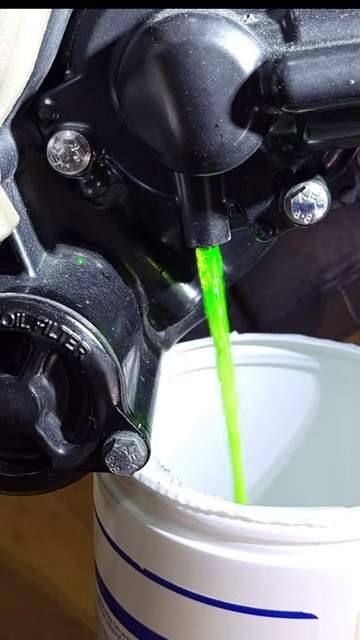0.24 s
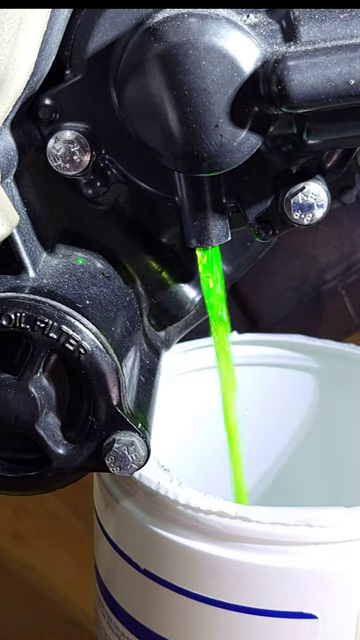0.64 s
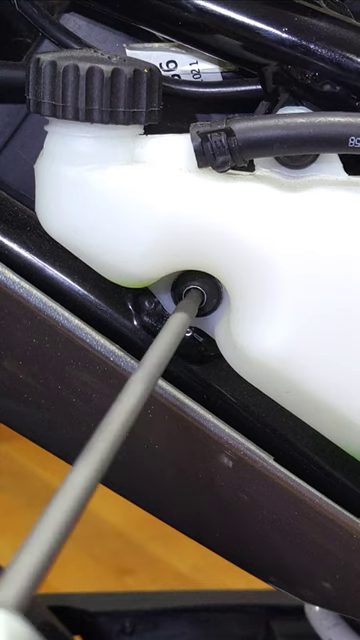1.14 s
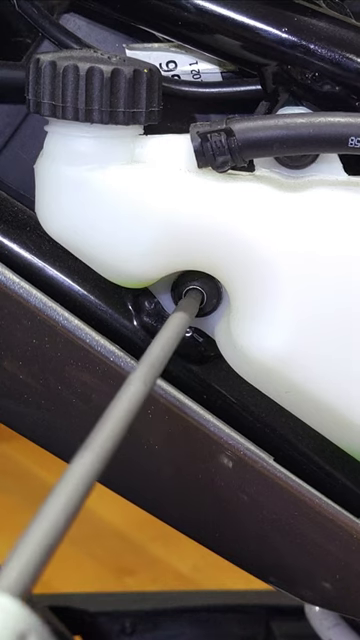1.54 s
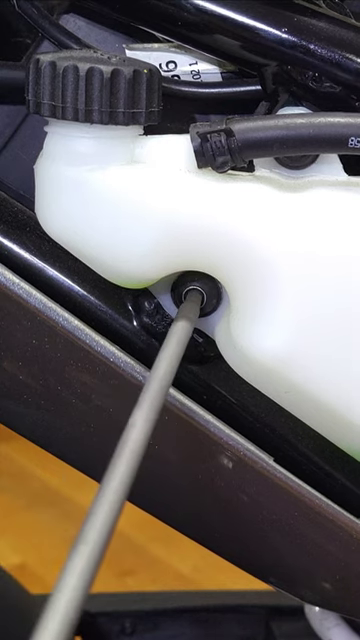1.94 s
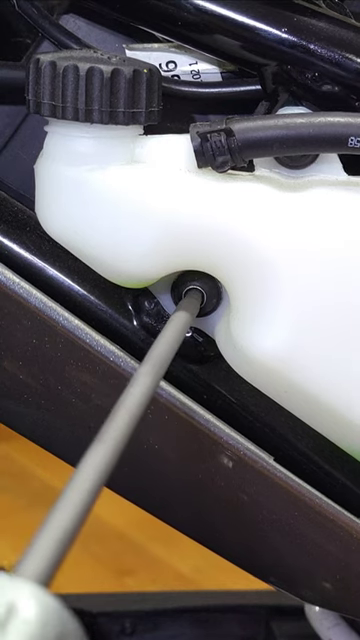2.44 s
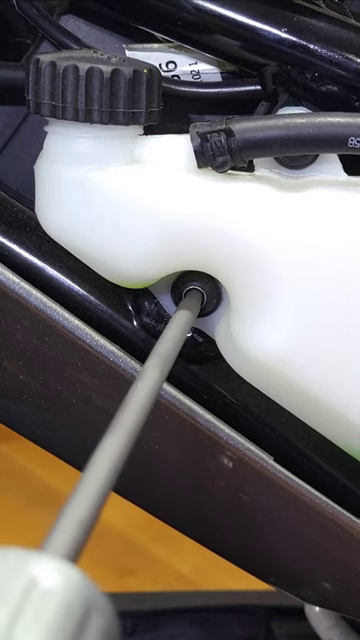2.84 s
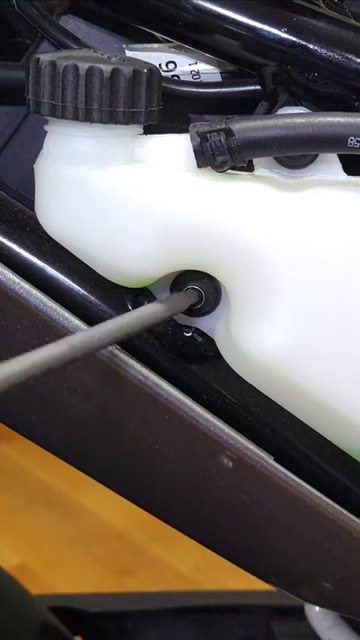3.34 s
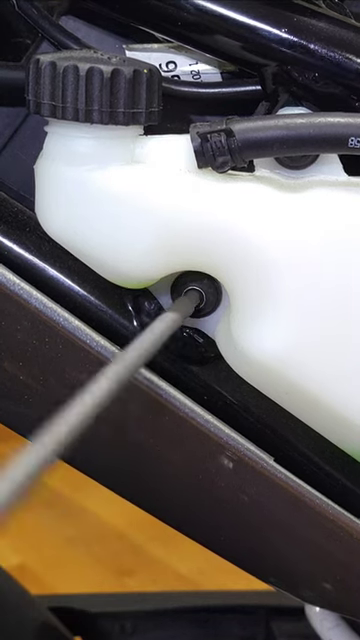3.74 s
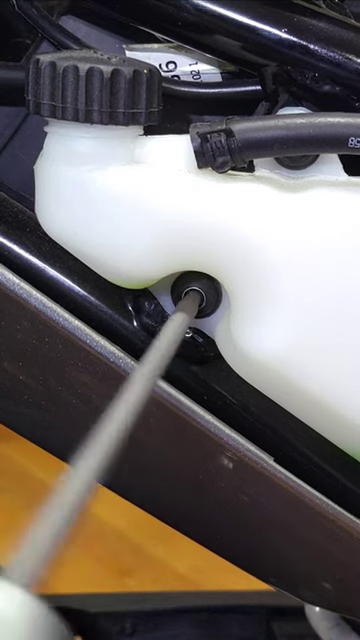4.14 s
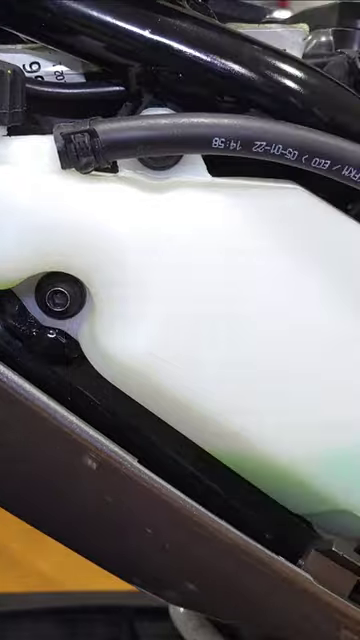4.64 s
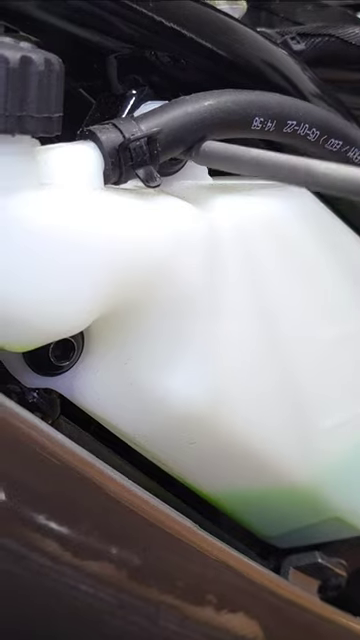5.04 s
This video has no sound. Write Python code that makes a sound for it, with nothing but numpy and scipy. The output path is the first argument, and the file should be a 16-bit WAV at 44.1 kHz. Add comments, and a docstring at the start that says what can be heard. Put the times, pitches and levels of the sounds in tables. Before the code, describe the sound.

First a bright, plopping pour into a hollow plastic container, ending suddenly. Then near silence over ventilation rumble, a dull tool knock, and irregular ratchety creaks from a screw in a plastic tank. Loud double-edged snaps come mid-way and late, ringing briefly in the room. Soft skin rubs and tiny ticks fill the pauses. Close, detailed stereo sound.

```python
"""A stream of coolant splashes and bubbles from an engine into a plastic tub; its sound stops abruptly. Then a
screwdriver works on the screws of a plastic tank: the tight thread creaks in runs of stick-slip clicks and
twice cracks loose, among soft touches of tool and hand. The screw sounds echo in a hard-walled workshop; two
close microphones hear it all over rumble and hum. Contacts are short bursts of shaped noise, bubbles are
gliding decaying sines, and resonances of tub, tank and frame colour them."""
import sys
import numpy as np
from scipy import signal
from scipy.fft import rfft, irfft, next_fast_len
from scipy.io import wavfile
from scipy.ndimage import uniform_filter1d

SR = 44100
rng = np.random.default_rng(int(sys.argv[2]) if len(sys.argv) > 2 else 0)


def digitize_waveform(pressure):
    """Quantize a signal to 16-bit integers and store it at the path in sys.argv[1].

    Rows of a 2-D input are taken as channels; values are limited to [-1, 1].
    """
    field = np.atleast_2d(pressure).T
    bounded = np.clip(field, -1, 1)
    quanta = np.round(bounded * 32767).astype(np.int16)
    wavfile.write(sys.argv[1], SR, quanta)


N = 233639
TIME = np.arange(N) / SR
BLOW = TIME[:4096]  # time axis of one short contact or bubble (s)
POUR_END_S = .677


def undb(db):
    """Decibels to gain."""
    return 10 ** (np.asarray(db) / 20)


def unit(x):
    """Scale to rms 1."""
    return x / np.sqrt(np.mean(x ** 2))


def along(points, hz):
    """Read (freq_hz, value) points on a log-frequency axis."""
    f, value = np.transpose(points)
    return np.interp(np.log(hz + 1), np.log(f), value)


def colour(x, points, peaks=()):
    """Causal minimum-phase filter: a broad spectrum with resonances standing on it."""
    size = 2 * next_fast_len(x.shape[-1])
    hz = np.fft.rfftfreq(size, 1 / SR)
    db = along(points, hz)
    for centre_hz, width_hz, gain_db in peaks:
        db = db + gain_db / (1 + (2 * (hz - centre_hz) / width_hz) ** 2)
    # folding the cepstrum onto positive times makes the response causal
    cepstrum = irfft(np.log(undb(db)))
    cepstrum[1:size // 2] *= 2
    cepstrum[size // 2 + 1:] = 0
    response = np.exp(rfft(cepstrum))
    return irfft(rfft(x, size) * response)[..., :x.shape[-1]]


def fade(t, t60):
    """Exponential decay, 60 dB in t60 seconds."""
    return np.exp(-np.log(1000) * t / t60)


def add(out, s, sound, lag_ms=0, pan_db=0):
    """Mix a sound in at s seconds; the right microphone hears it lag_ms later and pan_db weaker."""
    stereo = np.broadcast_to(sound, (2, sound.shape[-1]))
    for channel, side, lag_s, part in zip(out, (1, -1), (0, lag_ms / 1000), stereo):
        start = max(int((s + lag_s) * SR), 0)
        span = channel[start:start + len(part)]
        span += part[:len(span)] * undb(side * pan_db / 2)


def pair(size, likeness):
    """Noise for two microphones, partly shared: likeness 0 is independent, 1 identical."""
    shared, *own = rng.standard_normal((3, size))
    return np.sqrt(likeness) * shared + np.sqrt(1 - likeness) * np.array(own)


def burst(grain, t60, tick, rise=0.00042):
    """A contact and the dense, short ring of a damped part, built up over rise seconds; even in spectrum."""
    ring = grain * fade(BLOW, t60) * (1 - np.exp(-BLOW / rise))
    ring[:, int(rise * SR)] += tick
    spectrum = rfft(ring)
    power = uniform_filter1d(np.abs(spectrum) ** 2, size=48, axis=-1)
    even = irfft(spectrum * np.sqrt(power.mean() / power))
    return even * fade(BLOW, .25)


def bubble(hz, cycles, rise):
    """A trapped bubble rings down, its pitch gliding up by rise octaves as it nears the surface."""
    life = cycles / hz
    pitch_hz = hz * 2 ** (rise * np.minimum(BLOW / life, 1))
    tone = np.sin(2 * np.pi * np.cumsum(pitch_hz) / SR)
    return tone * fade(BLOW, life) * (1 - np.exp(-BLOW * hz))


# spectrum of the air in the building: freq_hz [Hz], level_db [dB]
AIR_COLOUR = [(12, -41), (20, 0.5), (74, -2), (134, -15), (198, -14), (328, -19), (357, -15.5), (513, -25),
              (590, -24), (873, -33), (1150, -34), (1910, -44.5), (4940, -52.5), (6720, -60.5),
              (16000, -63)]
AIR_DB = -54.5  # rms
# narrow bands of ventilation hum: pitch_hz [Hz], level_db [dB, rms]
HUM_BANDS = [(75, -65.5), (106, -70.5), (199, -69), (241, -71), (297, -71), (360, -69), (724, -82.5)]


def background():
    """Low rumble of the building, alike at both microphones, with a wavering hum of ventilation."""
    rumble = colour(pair(N, 1.0), [(110, -1.5), (220, -5.5), (600, -27.0)])
    diffuse = colour(pair(N, 0.25), [(40, -18.5), (110, -12), (220, -6.5), (600, 3.5)])
    air = undb(AIR_DB) * unit(colour(rumble + diffuse, AIR_COLOUR))
    hum = 0
    for hz, level_db in HUM_BANDS:
        # noise in a narrow band wavers
        band = [(hz * .85, -110), (hz * .98, 0), (hz * 1.02, 0), (hz * 1.15, -110)]
        hum = hum + undb(level_db) * unit(colour(pair(N, .88), band))
    return air + hum


# decay of the workshop by band: freq_hz [Hz], t60_s [s]
ROOM_DECAY = [(150, 0.32), (700, 0.45), (2400, 0.42), (4500, 0.43), (8000, 0.38), (15000, 0.26)]
# spectrum of the workshop's echoes: freq_hz [Hz], level_db [dB]
ECHO_COLOUR = [(150, -2.5), (450, 4), (750, 1.5), (1100, -4.5), (1500, -1), (2400, 1.5), (3300, -5.5),
               (7500, -4.5), (15000, 1.5)]


def workshop(x):
    """Diffuse echoes of the hard walls, each band with its own decay; the highest treble dies first."""
    t = TIME[:SR]
    hz, noise = np.fft.rfftfreq(SR, 1 / SR), rfft(pair(SR, 0.14))
    tail = 0
    for f, t60 in ROOM_DECAY:
        band = along([(other, float(other == f)) for other, _ in ROOM_DECAY], hz)
        tail = tail + irfft(noise * band) * fade(t, t60)
    # the first echoes arrive after 3 ms
    tail = colour(tail * np.clip((t - .003) / 0.0041, 0, 1), ECHO_COLOUR)
    return undb(-39) * signal.fftconvolve(x, tail, axes=-1)[:, :N]


# spectrum of the splashing droplets: freq_hz [Hz], level_db [dB]
SPLASH_COLOUR = [(100, -20), (250, -10), (420, -10), (900, -9), (1300, -7.5), (1560, -20), (2100, -1),
                 (3300, -17.5), (5000, -20.5), (7000, -11.5), (10000, -20.5), (16000, -21)]
# resonances of the tub's air and walls: centre_hz [Hz], width_hz [Hz], gain_db [dB]
TUB_PEAKS = [(402, 160, 12), (619, 59, 9), (1350, 110, 14), (2120, 300, 1), (4184, 110, 13)]
# big drops and the bubbles they trap: start_s [s], pitch_hz [Hz], bubble_db [dB], splash_db [dB]
BIG_DROPS = [(.012, 1930, -26, -30), (.070, 2170, -30, -27), (.131, 754, -27, -43),
             (.178, 1980, -29.5, -52), (.2285, 2040, -30.5, -30.5), (.257, 584, -24, -58),
             (.493, 1770, -31.5, -34.5), (.529, 2010, -29.5, -32), (.617, 1980, -19, -33),
             (.651, 1291, -23, -34.5)]
SPRAY_DB, GURGLE_DB, DRUMMING_DB = -43.5, -44.5, -52  # spread of each layer during the pour
BUBBLE_RING_S, BUBBLE_RISE_OCT = .026, 0.27  # shared by all big bubbles
GURGLE_FALL_DB_PER_S = 7.5  # the gurgle eases as the stream thins


def pour():
    """The steady stream patters on the liquid, traps bubbles and drums on the tub."""
    spray, bubbles, drops = np.zeros((3, 2, N))
    # droplets: many small ones, a few large
    for when, size, side, seat in rng.random((380, 4)):
        size_db = -4.3 * np.log(size + .05)
        droplet = burst(pair(len(BLOW), 0.49), 0.014, 2.5, .0008) * undb(size_db)
        add(spray, when * POUR_END_S, droplet, .3 * (2 * seat - 1), 6 * (side - .5))
    # the smallest bubbles fizz far above the gurgle
    for when, pitch, size, side, rise in rng.random((180, 5)):
        fizz = bubble(3500 * 2 ** (2 * pitch), 50, .15 * rise) * undb(21.8 * size - 8.5)
        add(spray, when * POUR_END_S, fizz, 0.34 * (2 * side - 1), 8 * (side - .5))
    for when, pitch, size, side, rise in rng.random((130, 5)):
        s = when * POUR_END_S
        blip = bubble(400 * 2 ** (2.5 * pitch), 19, .3 * rise)
        blip = blip * undb(17 * size - GURGLE_FALL_DB_PER_S * s)
        add(bubbles, s, blip, 0.4 * (2 * side - 1), 8 * (side - .5))
    for s, hz, bubble_db, splash_db in BIG_DROPS:
        splash = burst(pair(len(BLOW), 0.39), 0.04, 1.5, 0.0006)
        splash = colour(splash, [(200, -3.5), (2200, 7.5), (4500, -4.5), (15000, 0)])
        ringing = bubble(hz, BUBBLE_RING_S * hz, BUBBLE_RISE_OCT)
        add(drops, s, undb(bubble_db) * ringing + undb(splash_db) * splash, .07)
    spray = colour(spray, SPLASH_COLOUR, TUB_PEAKS)
    gurgle = colour(bubbles, [(150, -5.5), (400, -9.5), (1200, 6), (1560, -7.5), (2100, 6)], TUB_PEAKS)
    drumming = colour(pair(N, 1.0), [(40, -9), (90, 5.5), (160, -6.0), (260, -20), (600, -35)])
    layers = [(spray, SPRAY_DB), (gurgle, GURGLE_DB), (drumming, DRUMMING_DB)]
    stream = sum(undb(db) * x / np.std(x[:, TIME < POUR_END_S]) for x, db in layers)
    # the sound of the pour falls silent within 9.3 ms
    return (stream + drops) * np.clip((POUR_END_S + 0.0064 - TIME) / 0.0093, 0, 1)


# the hand slides to a new grip between turns: start_s [s], length_s [s], level_db [dB, before colouring]
GRIP_SLIDES = [(2.15, .22, -59), (2.77, .06, -56), (3.1, .08, -63), (4.0, .22, -59)]
# spectrum of skin on the handle: freq_hz [Hz], level_db [dB]
GRIP_COLOUR = [(300, -14), (1300, 0.5), (2500, -3), (5300, 1), (8000, -7.5), (15000, -19.5)]


def regrips():
    """Skin catches on the handle in a flurry of tiny grains."""
    out = np.zeros((2, N))
    for s, length_s, level_db in GRIP_SLIDES:
        for when, size in rng.random((16, 2)):
            grain = burst(pair(len(BLOW), .4), .03, 1.5)
            add(out, s + when * length_s, undb(level_db - 15 * size) * grain, .2)
    return colour(out, GRIP_COLOUR)


# the tip drops into the screw head and rocks once: start_s [s], level_db [dB, before colouring]
SEATING_KNOCKS = [(1.309, -13.5), (1.335, -24.5)]
# spectrum of the seating tip: freq_hz [Hz], level_db [dB]
SEATING_COLOUR = [(60, -8.5), (190, -0.5), (450, -15.5), (1500, -12.5), (3300, -21), (7000, -41),
                  (16000, -56)]
# resonances of screw and tank under the tip: centre_hz [Hz], width_hz [Hz], gain_db [dB]
SEATING_PEAKS = [(190, 120, 10.5), (1000, 210, 18.5), (2520, 450, 9)]
# light touches of tool and hand: start_s [s], peak_db [dB], pitch_hz [Hz]
LIGHT_TOUCHES = [(2.169, -47, 907), (2.205, -47, 1320), (2.272, -48, 900), (2.778, -44, 5660),
                 (2.965, -45, 2090), (3.466, -37.5, 550), (3.942, -41, 1440), (4.187, -44.5, 1000)]
SEAT_RING_S, TOUCH_RING_S = 0.03, .023
# fainter touches that fall anywhere after the pour
FAINT_DB, FAINT_SPREAD_DB, FAINT_LOW_HZ, FAINT_HIGH_HZ = -64.5, 8.5, 1100, 5500


def after_pour(when):
    """Map 0..1 to a moment (s) between the end of the pour and the end of the scene."""
    return POUR_END_S + when * (N / SR - POUR_END_S)


def touches():
    """The tip finds the screw; soft contacts each ring one resonance, among tiny ticks strewn at random."""
    out, ticks = np.zeros((2, 2, N))
    for s, level_db in SEATING_KNOCKS:
        knock = burst(pair(len(BLOW), .4), SEAT_RING_S, .8, 0.0013)
        add(out, s, undb(level_db) * colour(knock, SEATING_COLOUR, SEATING_PEAKS), .2)
    contacts = list(LIGHT_TOUCHES)
    for when, size, pitch in rng.random((22, 3)):
        pitch_hz = FAINT_LOW_HZ * (FAINT_HIGH_HZ / FAINT_LOW_HZ) ** pitch
        contacts.append((after_pour(when), FAINT_DB + FAINT_SPREAD_DB * size, pitch_hz))
    for s, peak_db, hz in contacts:
        contact = burst(pair(len(BLOW), 0.15), TOUCH_RING_S, 0.82, 0.0025)
        spectrum = [(hz / 4, -20), (hz, 0), (hz * 2, -14), (hz * 10, -60)]
        knock = colour(contact, spectrum, [(hz, .25 * hz, 7)])
        add(out, s, undb(peak_db) * knock / np.abs(knock).max(), .2)
    for when, size, side in rng.random((80, 3)):
        tick = undb(-79 + 13 * size) * burst(pair(len(BLOW), .5), .012, 3)
        add(ticks, after_pour(when), tick, .2, 8 * (side - .5))
    return out + colour(ticks, [(800, -11.0), (5000, -3.5), (15000, -4)])


# the screw cracks loose: start_s [s], level_db [dB, before colouring], thump_db [dB], treble_db [dB],
# ring_s [s], right microphone's lag_ms [ms], left minus right pan_db [dB]
CRACK_BLOWS = [(3.2464, -10.5, 10.5, 0.5, 0.02, 0.17, 4), (3.2492, -3, -3, 2.5, 0.012, 0.18, -1),
               (3.2533, -24.5, 2, -8.5, 0.067, .2, 1), (3.267, -24, -9, -3.5, 0.016, 0.31, 0),
               (4.8790, -10, 11.5, -3, 0.011, -0.019, -2), (4.8820, -16, 3.5, -12, 0.025, -0.17, 1)]
# spectrum of a crack: freq_hz [Hz], level_db [dB]
CRACK_SPECTRUM = [(59, -43), (100, -19.5), (328, -17), (513, -20.5), (784, -1.5), (1150, -12.5),
                  (1450, -11), (1830, -7), (2580, -4), (5300, -8), (5900, -11), (7770, -9), (9820, -17),
                  (15000, -19), (16000, -30.5)]
# resonances of screwdriver and frame under a crack: centre_hz [Hz], width_hz [Hz], gain_db [dB]
FRAME_PEAKS = [(111, 250, 5.5), (332.6, 330, 5), (720, 120, 2.5), (1000, 120, 7.5), (1433, 156, 13),
               (1668, 88, 6), (2040, 280, 5), (2530, 790, 6.5), (4440, 92, 6.5), (7600, 540, 4)]


def cracks():
    """The screw gives way all at once and jolts screwdriver and frame, which chatter briefly."""
    out = np.zeros((2, N))
    for s, level_db, thump_db, treble_db, ring_s, lag_ms, pan_db in CRACK_BLOWS:
        blow = burst(pair(len(BLOW), 0.61), ring_s, 3.07, .0007)
        blow = colour(blow, [(220, thump_db), (900, -treble_db / 2), (2200, 0.0099), (6000, treble_db)])
        add(out, s, undb(level_db) * blow, lag_ms, pan_db)
    return undb(11.5) * colour(out, CRACK_SPECTRUM, FRAME_PEAKS)


# slips of the thread, slow or fast, each with its own time: start_s [s], level_db [dB, before colouring]
SINGLE_SLIPS = [(1.4497, -27.5), (1.4602, -12.5), (1.5554, -33), (1.5668, -17.5), (1.651, -19.5),
                (1.6986, -41), (1.7083, -15.5), (1.7305, -28.5), (1.7579, -20), (1.7913, -22),
                (1.8135, -17), (1.835, -20), (1.8838, -19.5), (1.95, -19), (3.6381, -13.5), (3.6699, -17.5),
                (3.697, -16), (3.7664, -10.5), (3.7815, -16.5), (3.7998, -15), (3.8354, -15.5),
                (4.366, -27), (4.3785, -15.5), (4.5, -14.5), (4.5415, -19), (5.2784, -26), (5.2861, -16.5)]
# stretches where a turn chatters evenly: start_s [s], end_s [s], rate_hz [slips per s],
# first_level_db and last_level_db [dB, before colouring]
EVEN_CHATTER = [(3.716, 3.7517, 80, -16, -16), (4.398, 4.48, 73, -15, -16.5)]


def slips():
    """Time and level of every slip: those timed one by one, and the even chatter."""
    rows = list(SINGLE_SLIPS)
    for start, end, rate, first_db, last_db in EVEN_CHATTER:
        count = round((end - start) * rate) + 1
        rows.extend(np.linspace((start, first_db), (end, last_db), count))
    return rows


# turns of the wrist: start_s [s], end_s [s], body_db [dB, before colouring], treble_db [dB, against the
# slip's level], first_bright_hz and last_bright_hz [Hz], left minus right pan_db [dB]
WRIST_TURNS = [(1.44, 1.58, -42.5, -19.5, 2826, 4100, 3.5), (1.60, 1.96, -39, -16, 3800, 7300, 1.5),
               (3.63, 3.845, -42, -22.5, 4320, 7300, 2), (4.36, 4.55, -35.5, -20.5, 3496, 7400, 2),
               (5.24, 5.40, -48, -9.5, 6220, 7000, -2.5)]
# spectrum of the creaking thread: freq_hz [Hz], level_db [dB]
CREAK_COLOUR = [(120, -4.5), (200, 4.5), (440, -2.5), (623, -4), (696, -11), (968, -1), (1230, -5),
                (1420, 0), (2050, -6.5), (5940, -5.5), (9930, -6), (14900, -13), (16000, -12.5)]
# resonances of the tank and its bracket: centre_hz [Hz], width_hz [Hz], gain_db [dB]
TANK_PEAKS = [(456, 70, 7.5), (764, 160, 8), (977, 140, 7), (1414, 170, 11), (1750, 53, 7),
              (2270, 150, 4.5), (3530, 370, 5), (5800, 320, 4), (9800, 830, -5)]
USUAL_SLIP_DB, TREBLE_PER_DB = -17, 1.05  # around the usual level, treble grows faster than the slip (dB per dB)
TREBLE_RISE_DB, BRIGHT_SPREAD_OCT = 5.5, .15  # treble grows through a turn; each slip rings a little differently
BODY_SWELL_DB = 5  # the tank booms more at full speed
SLIP_RING_S, RING_SWELL_S = .02, .008  # ring of a slow slip, and what full speed adds
SLIP_PAN_SPREAD_DB = 2.5  # at full speed


def creaks():
    """The thread sticks and slips; as a turn goes on it rings the tank more brightly, low modes longest."""
    out, tank = np.zeros((2, N)), pair(len(BLOW), 0.085)
    for s, level_db in slips():
        turn = min(WRIST_TURNS, key=lambda row: max(row[0] - s, s - row[1]))  # the nearest turn
        start, end, turn_body_db, turn_treble_db, first_hz, last_hz, turn_pan_db = turn
        progress = np.clip((s - start) / (end - start), 0, 1)
        speed = np.sin(np.pi * progress)  # each turn speeds up and slows down
        bright_hz = first_hz * (last_hz / first_hz) ** progress
        bright_hz *= 2 ** (BRIGHT_SPREAD_OCT * rng.standard_normal())
        treble_db = USUAL_SLIP_DB + TREBLE_PER_DB * (level_db - USUAL_SLIP_DB)
        treble_db += turn_treble_db + TREBLE_RISE_DB * (progress - .5)
        body_db = turn_body_db + BODY_SWELL_DB * speed
        ring_s = SLIP_RING_S + RING_SWELL_S * speed
        pan_db = turn_pan_db + SLIP_PAN_SPREAD_DB * speed * rng.standard_normal()
        # every slip shares part of its grain with the same tank
        grain = 0.82 * tank + 0.91 * pair(len(BLOW), 0.077)
        # a longer slip also takes longer to get going
        snap = burst(grain, ring_s, 3.17, 0.04 * ring_s)
        snap_colour = [(1200, level_db - 36.5), (2500, level_db - 13.0),
                       (7000, level_db - 14), (11000, treble_db + 2.5)]
        snap = colour(snap, snap_colour, [(bright_hz, 1800, 6)])
        body = burst(grain, 1.62 * ring_s, 0.71, .001)
        body_colour = [(200, body_db - 15.5), (700, body_db - 2), (1800, body_db - 2.5), (3500, body_db - 43.5)]
        body = colour(body, body_colour)
        add(out, s + 0.0014, snap + body, .45, pan_db)
        # a few faint random copies of the snap in the 10 ms before each slip
        for lead, size in rng.random((4, 2)):
            add(out, s - 0.0097 * lead, undb(-27 + 12.0 * size - 3.3 * lead) * snap, .45, pan_db)
    return undb(14) * colour(out, CREAK_COLOUR, TANK_PEAKS)


ECHO_STOP_S = (4.655, 4.86)  # the echo is silent from, to


def scene():
    """The pour, then the screwdriver in the room; the echo breaks off once, until just before a crack."""
    creak, crack, touch = creaks(), cracks(), touches()
    echo = workshop(undb(-3.0) * creak + crack + undb(-4) * touch)
    silent = (TIME > ECHO_STOP_S[0]) & (TIME < ECHO_STOP_S[1])
    echo = echo * uniform_filter1d(1. - silent, size=600)
    return background() + echo + pour() + regrips() + touch + crack + creak


def record(dry):
    """The recorder rounds the highest peaks and cuts the top above 15.9 kHz."""
    top_cut = signal.ellip(10, .2, 70, 15900, fs=SR, output="sos")
    return signal.sosfilt(top_cut, np.tanh(dry))


dry = scene()
out = record(dry)
digitize_waveform(out)
```